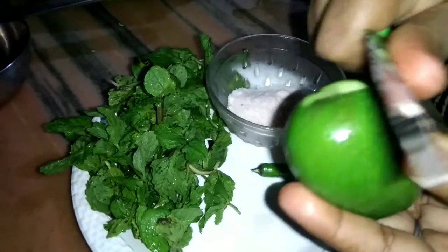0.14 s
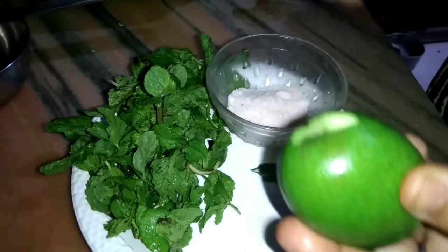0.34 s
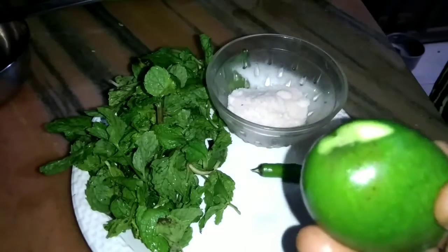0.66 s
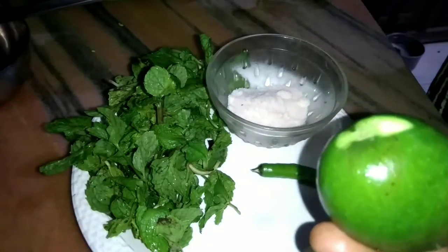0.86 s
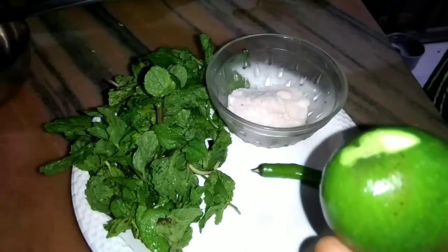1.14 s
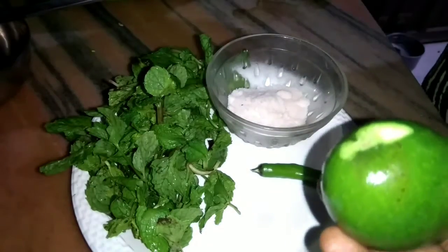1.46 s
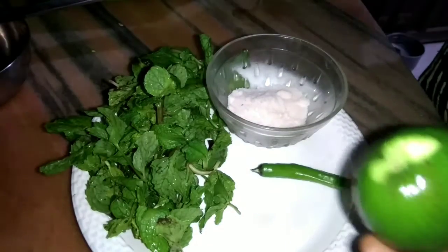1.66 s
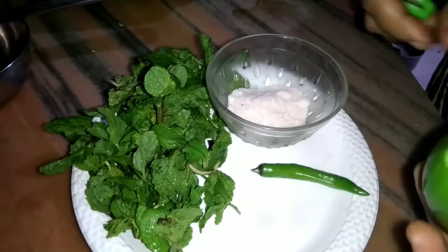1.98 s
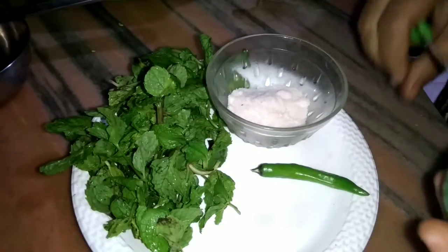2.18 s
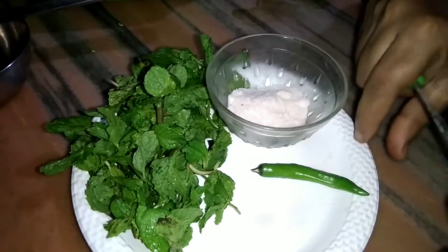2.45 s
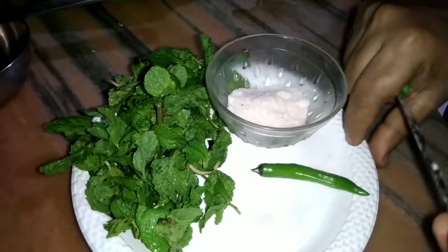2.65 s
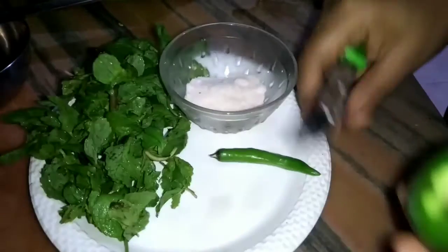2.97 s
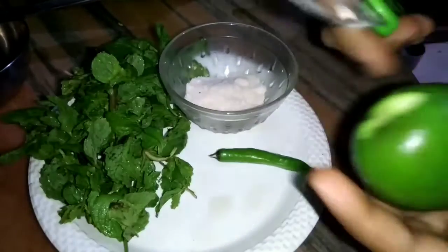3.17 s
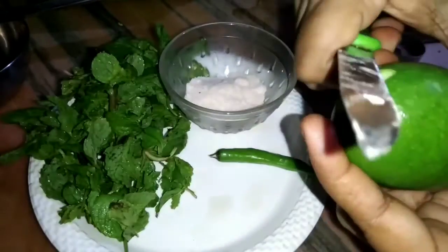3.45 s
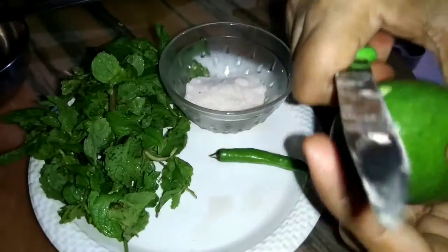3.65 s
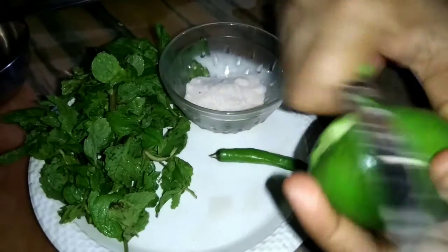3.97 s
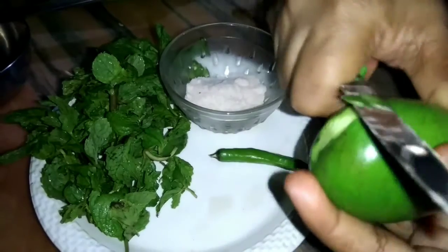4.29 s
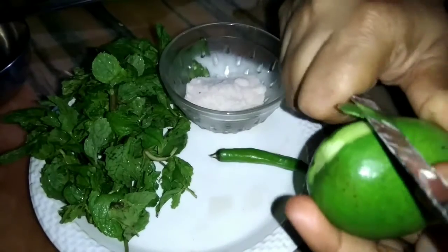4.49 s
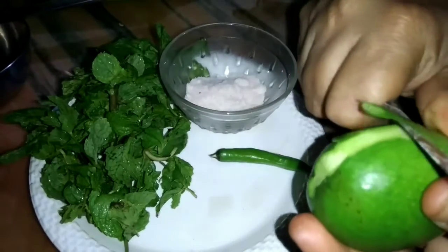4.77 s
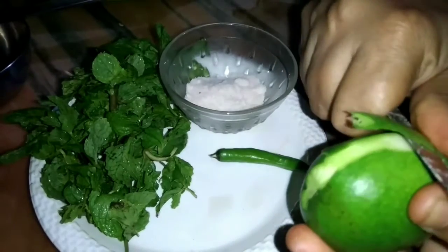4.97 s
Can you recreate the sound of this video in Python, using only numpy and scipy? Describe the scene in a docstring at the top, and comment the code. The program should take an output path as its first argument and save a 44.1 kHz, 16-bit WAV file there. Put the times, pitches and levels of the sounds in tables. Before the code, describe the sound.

Close, slightly dull-topped pickup in a small room. The low hum swells and fades throughout. First almost nothing but faint short tones, then a single hard knock, a pause, and a quick grinding, clattering shove of a plastic plate. After another pause, a knife bites into fruit with soft thuds, wet scratches and scattered light clicks as peel tears.

```python
"""A knife at work close by in a quiet kitchen: the blade bites into a fruit, slides under the skin and ticks as
the peel tears. Rough friction noise drives the blade's resonances; each tick is a puff of noise with short rings,
and one faint tick stands alone early on. Before the cutting a knife taps something hard, a set of decaying modes,
and a plastic plate is shoved over the table, grit through its shell with bursts where the rim catches. Behind it
all a fan drones in the room's low resonances: wavering tones, resonant noise, a thin hiss. Faint short tones sound."""
import sys
import numpy as np
from scipy import signal
from scipy.fft import rfft, irfft, next_fast_len
from scipy.io import wavfile
from scipy.ndimage import uniform_filter1d, map_coordinates

SR = 44100
rng = np.random.default_rng(int(sys.argv[2]) if len(sys.argv) > 2 else 0)


def store_pcm(level_fs):
    """Save levels as 16-bit WAV."""
    pcm = np.round(np.clip(level_fs, -1, 1) * 32767).astype(np.int16)
    wavfile.write(sys.argv[1], SR, np.atleast_2d(pcm).T)


N = 225902  # samples

# Blade strokes under the skin. Each row: start in seconds, push length in seconds, rasp in dB, thud in dB.
STROKES = [(3.782, 0.017, -60.5, -64.5), (4.056, 0.12, -55, -56.5), (4.183, .04, -55.5, -78),
           (4.568, 0.011, -77, -76)]
# High, steely resonances. Each row: frequency in Hz, width in Hz, relative level in dB.
STEEL_MODES = [(1810, 56, 1.5), (3460, 370, 1.5), (4070, 180, -32), (5390, 92, -2), (6300, 730, -1),
               (7800, 280, 3), (8820, 200, -4), (10000, 310, 2.5), (12650, 420, 0), (14300, 410, 0.5)]


def amp(db):
    """Amplitude factor of a level in dB."""
    return 10 ** (np.asarray(db) / 20)


def unit(x):
    """x scaled to rms 1."""
    return x / np.sqrt(np.mean(x ** 2) + 1e-20)


def along(points, hz):
    """Read a curve of (Hz, value) points on a log frequency axis."""
    f, v = np.transpose(points)
    return np.interp(np.log(hz + 1), np.log(f + 1), v)


def curves(rows):
    """One level in dB per sample for each column after the time, silent outside the table."""
    s, *columns = np.transpose(rows)
    return [np.interp(np.arange(N) / SR, s, column, -200, -200) for column in columns]


def wobble(rate):
    """A smooth random curve, rate knots a second."""
    knots = rng.standard_normal(int(N * rate / SR) + 4)
    return map_coordinates(knots, [np.arange(N) * rate / SR])


def filtered(x, response):
    """x times a complex response of frequency, padded so that ringing does not wrap round."""
    m = next_fast_len(N + SR // 2)
    return irfft(rfft(x, m) * response(np.fft.rfftfreq(m, 1 / SR)), m)[:N]


def body(modes):
    """Causal response of a set of (Hz, width Hz, dB) resonances, alternating in sign."""
    def response(f):
        return sum((-1) ** k * amp(db) * 1j * f * width / (centre * centre - f * f + 1j * f * width)
                   for k, (centre, width, db) in enumerate(modes))
    return response


def rubbed(force, level_db, response):
    """A force under its level drives a body whose response is scaled to pass white noise of rms 1 at rms 1."""
    noise_gain = np.sqrt(np.mean(np.abs(response(np.linspace(1, SR / 2, 20000))) ** 2))
    return filtered(force * amp(level_db), response) / noise_gain


def grit(spread_db, lumps_db, rate, patchy_db):
    """Friction force: uneven grains in clumps, whose colour changes in patches as the contact shifts."""
    z = signal.stft(rng.standard_normal(N + 256), nperseg=256)[2]
    over_frequency = uniform_filter1d(rng.standard_normal(z.shape), size=2, axis=0)
    patches = unit(uniform_filter1d(over_frequency, size=7, axis=1))
    noise = signal.istft(z * amp(patchy_db * patches), nperseg=256)[1][:N]
    grains_db = spread_db * np.minimum(rng.exponential(size=N), 4)
    return unit(noise * amp(grains_db + lumps_db * wobble(rate)))


def ring(hz, t60, attack):
    """One decaying mode with a soft start; t60 and attack in seconds."""
    t = np.arange(SR // 2) / SR
    return np.sin(2 * np.pi * hz * t) * amp(-60 * t / t60) * (1 - np.exp(-t / attack))


def burst(t60, attack):
    """A swelling and dying puff of noise; t60 and attack in seconds."""
    t = np.arange(SR // 4) / SR
    return rng.standard_normal(len(t)) * amp(-60 * t / t60) * (1 - np.exp(-t / attack))


def place(events):
    """Sum (start in seconds, sound) pairs on the time line."""
    out = np.zeros(N + SR)
    for s, sound in events:
        out[round(s * SR):][:len(sound)] += sound
    return out[:N]


def room(x):
    """The kitchen walls answer with a noise tail in which each frequency dies at its own speed."""
    # Decay of the walls' answer. Each row: frequency in Hz, t60 in seconds.
    walls = [(300, 0.36), (2000, 0.26), (10000, 0.26)]
    hz, t, z = signal.stft(rng.standard_normal(SR // 2), SR, nperseg=256)
    fade_db = -60 * t / along(walls, hz)[:, None]
    tail = signal.istft(z * amp(fade_db), SR, nperseg=256)[1]
    delayed = np.pad(x, (200, 0))  # samples
    return signal.fftconvolve(delayed, tail / np.linalg.norm(tail))[:N]


def hum(hz, db):
    """A tone that wavers in pitch and level."""
    level = np.sqrt(2) * amp(db + 1.5 * wobble(13))
    phase = 2 * np.pi * np.cumsum(hz + 2.49 * wobble(12)) / SR
    return level * np.sin(phase)


def fan():
    """Three wavering tones and air noise that fills the room's resonances, over a thin hiss."""
    # The drone swells and fades band by band. Each row: time in seconds, then the levels in dB of
    # the motor tone, lower boom, higher boom, middle and upper resonances.
    drone_levels = [(0.0, -60, -57.5, -46.5, -59.5, -57.5), (0.64, -48, -57, -66.5, -59, -57),
                    (0.95, -58, -63, -59, -61.5, -55.5), (1.03, -64, -60, -79, -61, -56),
                    (1.14, -53.5, -58.5, -59.5, -65, -55), (1.33, -48, -58, -60.5, -60, -57),
                    (1.57, -57.5, -53.5, -56.5, -61, -55.5), (1.71, -41.5, -56, -61, -61.5, -53.5),
                    (2.08, -54, -68, -54, -53.5, -57), (2.37, -56, -63, -62, -55, -59),
                    (2.55, -57, -57.5, -60, -56, -56.5), (2.84, -55.5, -72, -48, -61, -56),
                    (3.04, -52, -58, -54, -57, -58), (3.28, -51, -46.5, -51, -59, -60.5),
                    (3.38, -51.5, -47.5, -55, -57, -61), (3.82, -47, -64, -54, -59.5, -58),
                    (3.96, -54.5, -55.5, -63, -56, -56), (4.19, -56.5, -62, -58, -58.5, -52.5),
                    (4.26, -45.5, -61, -59.5, -54.5, -56.5), (4.59, -53, -61, -56, -63.5, -58.5),
                    (4.63, -55, -80, -52.5, -60, -57.5), (4.71, -59.5, -65, -64, -65, -58.5),
                    (4.88, -51.5, -73, -60, -65, -55.5), (5.12, -54.5, -55.5, -85.5, -62.5, -58)]
    # Frequencies in Hz of the motor tone, the lower and the higher boom.
    tones_hz = (91, 103.95, 117.5)
    # Room resonances, low to high. Each row: frequency in Hz, width in Hz (of one pass of two), level in dB (same).
    boom_modes = [(69.5, 45.6, -6), (104.3, 19.7, -2.5), (117.1, 8.7, -0.5), (143.2, 10.7, -4)]
    middle_modes = [(168, 19.8, -1), (196.6, 21.6, -0.5), (243.9, 24, -3.5), (310, 41, -5.5)]
    upper_modes = [(342.7, 32.8, -1.5), (387.2, 22, 1), (434, 61.7, -5)]
    # Colour of the steady hiss. Each row: frequency in Hz, relative density in dB per Hz.
    hiss_colour = [(25, 4), (60, 7), (300, 6.5), (480, -4.5), (600, -5.5), (1500, -8), (4000, -14.5),
                   (9000, -21), (12600, -22), (13200, -32.5), (15700, -23)]
    boom_noise_db, wander_db = -0.5, 2  # air noise against the boom tones; quick free swells
    hiss_db = -72

    def twice(modes):
        """Noise passed twice through the resonances, which leaves dark valleys between them."""
        return unit(filtered(rng.standard_normal(N), lambda f: body(modes)(f) ** 2))

    *tones_db, middle_db, upper_db = curves(drone_levels)
    tones = sum(hum(hz, db) for hz, db in zip(tones_hz, tones_db))
    boom = amp(boom_noise_db) * np.hypot(*amp(tones_db[1:])) * twice(boom_modes)
    middle = amp(middle_db + wander_db * wobble(7)) * twice(middle_modes)
    upper = amp(upper_db + wander_db * wobble(7)) * twice(upper_modes)
    hiss = unit(filtered(rng.standard_normal(N), lambda f: amp(along(hiss_colour, f))))
    return tones + boom + middle + upper + amp(hiss_db + 0.53 * wobble(8)) * hiss


def blips():
    """Faint short soft-edged tones, each a single decaying mode."""
    # Each row: start in seconds, level in dB before the soft start, frequency in Hz.
    faint_tones = [(.02, -64.5, 5570), (.92, -60, 750), (1.11, -61.5, 761), (1.745, -55.5, 823),
                   (4.325, -66, 1970), (4.397, -67.5, 2070), (4.405, -64, 816), (4.405, -66, 1540),
                   (4.535, -61, 906)]
    return place([(s, amp(db) * ring(hz, 0.078, attack=0.0061)) for s, db, hz in faint_tones])


def tap():
    """A rattling blow of some milliseconds rings a hard object; at first each mode is blurred by the chatter."""
    # Modes of the hard object. Each row: frequency in Hz, relative level in dB, t60 in seconds.
    hard_modes = [(660, -20, .12), (945, -10, .16), (1238, -12, .14), (1402, -6, .13), (1575, -4, .21),
                  (1750, -13, .14), (1983, -2.5, .21), (2268, -8, .15), (2600, -18, .12), (2990, -18, .16),
                  (3240, -14, .11), (3958, -13, .14), (4409, -20, .13), (4848, -14, .17), (5127, -16, .13),
                  (6142, -21, .17), (7849, -30, .15)]
    tap_s = 1.2828
    bell = sum(amp(db) * ring(hz, t60, attack=0.0023) for hz, db, t60 in hard_modes)
    blow = burst(0.055, attack=0.0024)
    rattle = signal.fftconvolve(bell, blow / np.linalg.norm(blow))[:SR // 2]
    blurred = body([(hz, 90 + 0.019 * hz, db) for hz, db, _ in hard_modes])
    puff = place([(tap_s, burst(0.18, attack=0.0042))])
    chatter = rubbed(puff, -40.5, lambda f: blurred(f) + amp(-36.5) * (f > 600))
    return chatter + place([(tap_s, amp(-43.0) * bell + amp(-47) * rattle)])


def plate():
    """The rim grinds over the table; each snag is a short burst of force that rings the shell."""
    # The plate slides slowly, then fast. Each row: time in seconds, level in dB.
    slide_levels = [(2.668, -59), (2.708, -53.5), (2.73, -53.5), (2.796, -38.5), (2.872, -36.5),
                    (2.94, -45), (3.02, -61)]
    # The rim catches. Each row: start in seconds, level in dB, low ring in Hz, high ring in Hz.
    snags = [(2.6593, -44.5, 1740, 3670), (2.701, -47.5, 2200, 2750), (2.7709, -34.5, 2100, 3625),
             (2.826, -29, 2110, 2920), (2.8463, -33.5, 1670, 2970), (2.8584, -27.5, 2070, 2940),
             (2.8784, -33.5, 2220, 2790), (2.8976, -34.5, 2000, 2880), (2.924, -32.5, 2150, 2860),
             (2.945, -38, 2080, 2880)]
    # Resonances of the shell. Each row: frequency in Hz, width in Hz, relative level in dB.
    shell_modes = [(1690, 120, -44), (2200, 280, -9.5), (2790, 65, -2), (2874, 63, 2.5), (2982, 105, -3),
                   (3640, 134, -3), (4120, 370, -12), (5360, 94, -4), (6440, 332, -23), (7740, 200, -14)]
    # Broad rub under the resonances. Each row: frequency in Hz, relative density in dB per Hz.
    rub_colour = [(880, -49), (1500, -12), (2570, -16), (2890, -8), (3350, -1.5), (4120, -6.5),
                  (15600, -26.5)]
    # Table resonances, then the table top's deep ones. Each row: frequency in Hz, width in Hz, relative level in dB.
    table_modes = [(642, 98, 0), (987, 97, 0.5), (1307, 72, -3)]
    deep_modes = [(175, 20, 2), (434, 40, -4.5)]
    table_peak_db, table_grows = -42, 1.36  # at the loudest of the slide; swings wider than the slide
    deep_db = -5  # against the table
    ring_grows = 1.1  # the shell's resonances come up faster than the rub as the plate speeds up
    rim_db, ring_db = -5, 0.2  # low and high ring against the burst

    def rub(f):
        return amp(along(rub_colour, np.minimum(f, 15000)))

    def shell(f):
        return body(shell_modes)(f) + amp(-9) * rub(f)

    level_db, = curves(slide_levels)
    below_peak_db = level_db - level_db.max()
    force = grit(spread_db=2.5, lumps_db=2, rate=110, patchy_db=3.5)
    table_db = table_peak_db + table_grows * below_peak_db
    shell_share = amp((ring_grows - 1) * below_peak_db)
    rub_share = np.sqrt(np.abs(1 - shell_share ** 2))
    out = shell_share * rubbed(force, level_db, shell) + rub_share * rubbed(force, level_db, rub)
    out += rubbed(force, table_db, body(table_modes))
    out += rubbed(force, table_db + deep_db, body(deep_modes))
    catches = place([(s, amp(db) * burst(0.044, attack=.0008)) for s, db, *_ in snags])
    out += rubbed(catches, 0, shell)
    for s, db, low_hz, high_hz in snags:
        low_ring = amp(db + rim_db) * ring(low_hz, 0.033, attack=0.00068)
        high_ring = amp(db + ring_db) * ring(high_hz, 0.038, attack=0.00041)
        out += place([(s, low_ring + high_ring)])
    return out


def pushes(levels_db, sag_db_per_s, release_db_per_s):
    """Force of the strokes in dB: each bites, sags while the hand pushes, then lets go."""
    bite_s = .011
    shapes = []
    for (s, length, *_), db in zip(STROKES, levels_db):
        t = np.arange(N) / SR - s
        bite_db = 20 * np.log10(np.clip(t / bite_s, 1e-9, 1))
        sag_db = sag_db_per_s * np.clip(t, 0, length)
        release_db = release_db_per_s * np.maximum(t - length, 0)
        shapes.append(db + bite_db - sag_db - release_db)
    return np.max(shapes, axis=0)


def strokes():
    """The edge rasps through the flesh, juice fizzes, the fruit thuds against the hand."""
    # Resonances of the blade under the rasp. Each row: frequency in Hz, width in Hz, relative level in dB.
    blade_modes = [(1300, 63, -14), (1623, 65, 5.5), (2090, 130, -4), (2510, 120, 6), (2840, 50, -1),
                   (3220, 99, 1.5), (4155, 117, -1.5), (5670, 187, -1.5)]
    # Colour of the fizz. Each row: frequency in Hz, relative density in dB per Hz.
    fizz_colour = [(2350, -12.5), (4000, -5), (5440, -4), (5990, -4), (7700, -3.5), (11400, -9.5),
                   (15600, -11.5)]
    # The flesh, then the fruit pressed into the hand. Each row: frequency in Hz, width in Hz, relative level in dB,
    # both of one pass of two.
    flesh_modes = [(543, 194, 1), (720, 96, -2.5)]
    fruit_modes = [(143.5, 28, -0.5), (260, 37, -5)]
    # The flat of the blade glides to its start. Each row: time in seconds, level in dB before the low cut.
    glide_levels = [(3.98, -96), (3.992, -84), (4.024, -78), (4.058, -70)]
    fizz_db, fruit_db = -3.5, 15  # fizz against the rasp; deep thud over the flesh

    def edge(f):
        return body(blade_modes)(f) + amp(-10.5) * (f > 1100) / (1 + (f / 4500) ** 4)

    def fizz_response(f):
        return amp(along(fizz_colour, np.minimum(f, 15000)))

    _, _, rasps_db, thuds_db = np.transpose(STROKES)
    rasp_db = pushes(rasps_db, sag_db_per_s=43, release_db_per_s=328)
    thud_db = pushes(thuds_db, sag_db_per_s=72, release_db_per_s=300)
    rasp = rubbed(grit(spread_db=1.5, lumps_db=2, rate=90, patchy_db=4), rasp_db, edge)
    fizz_force = grit(spread_db=1.5, lumps_db=1, rate=90, patchy_db=3)
    fizz = rubbed(fizz_force, rasp_db + fizz_db, fizz_response)
    glide_db, = curves(glide_levels)
    glide = rubbed(rng.standard_normal(N), glide_db, lambda f: body(STEEL_MODES)(f) ** 2 * (f > 5000))
    push = rng.standard_normal(N)
    flesh_thud = rubbed(push, thud_db, lambda f: body(flesh_modes)(f) ** 2)
    fruit_thud = rubbed(push, thud_db + fruit_db, lambda f: body(fruit_modes)(f) ** 2)
    return rasp + fizz + glide + flesh_thud + fruit_thud


def ticks():
    """Each tick is a bright puff of noise that excites high resonances, every mode at a new strength."""
    # Small ticks: one faint and alone early on, the rest as the blade tears peel. Each row: start in seconds,
    # level in dB, brightness in dB, low ring in Hz, high ring in Hz.
    tick_rows = [(1.744, -65, -24, 1540, 4380), (3.7897, -47.5, -40, 2080, 5594),
                 (3.8068, -49, -32, 2240, 6000), (4.0601, -52, -15, 1750, 4910),
                 (4.191, -45, -14.5, 3140, 6500), (4.2192, -50, -29, 2770, 5760),
                 (4.2379, -50.5, -33, 3310, 5730), (4.272, -57, -17, 2490, 5800),
                 (4.3248, -61.5, -24, 1922, 5620), (4.5772, -47, -12.5, 3180, 5400),
                 (4.602, -60, -13, 3180, 5460), (4.6174, -59, -20, 3920, 5460),
                 (4.6377, -55.5, -3, 3170, 5420), (4.6757, -52.5, 9, 3190, 5580),
                 (4.7058, -53, 16, 2880, 6820), (4.851, -55, 4.5, 2850, 6430),
                 (5.003, -59, 7.5, 4740, 7540)]
    free_db = -6.5  # the two rings against the puff
    out = np.zeros(N)
    for s, db, bright_db, low_hz, high_hz in tick_rows:
        scatter_db = rng.normal(0, 3, len(STEEL_MODES))
        modes = [(centre, width, level + scatter + bright_db * (centre > 6000) / 2)
                 for (centre, width, level), scatter in zip(STEEL_MODES, scatter_db)]

        def tick_response(f):
            return body(modes)(f) + amp(bright_db - 5.5) * f / (f + 4000)

        # two clear modes, low and high, ring beside the puff
        free = ring(low_hz, 0.039, attack=0.0018)
        free += amp(bright_db / 2 - 1.0) * ring(high_hz, 0.027, attack=0.0037)
        out += rubbed(place([(s, burst(0.051, attack=0.0051))]), db, tick_response)
        out += place([(s, amp(db + free_db) * free)])
    return out


def scene():
    """Near sounds with their own share of room, over the blips and the fan."""
    parts = [(tap(), -4), (plate(), -4), (strokes(), -5), (ticks(), -8)]  # (sound, room dB)
    near = sum(x + amp(db) * room(x) for x, db in parts)
    return (near + blips() + fan())[None]


def record(dry):
    """The recorder keeps nothing above its band limit."""
    top_hz = 15760
    return filtered(dry[0], lambda hz: hz < top_hz)[None]


dry = scene()
out = record(dry)
store_pcm(out)
```